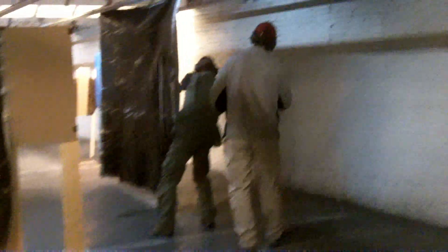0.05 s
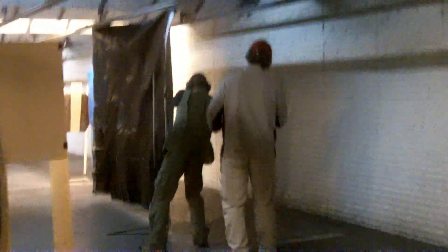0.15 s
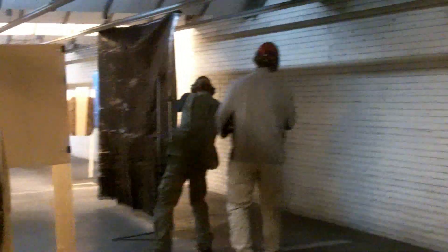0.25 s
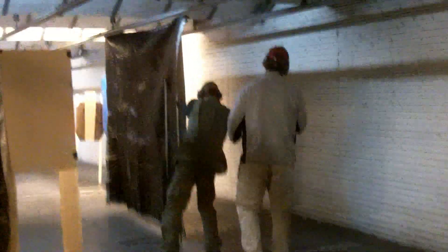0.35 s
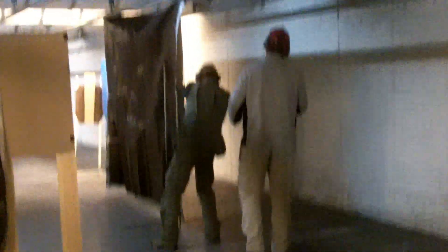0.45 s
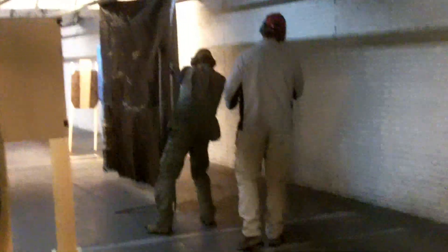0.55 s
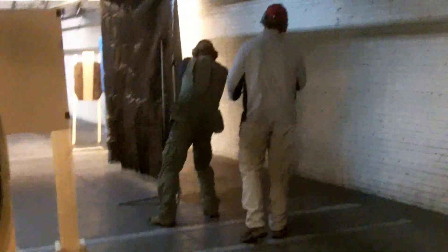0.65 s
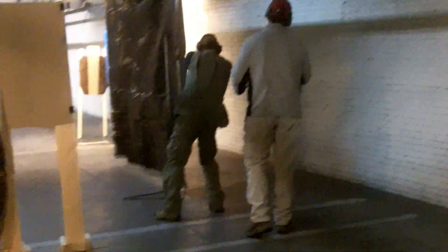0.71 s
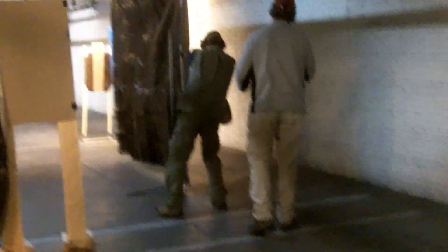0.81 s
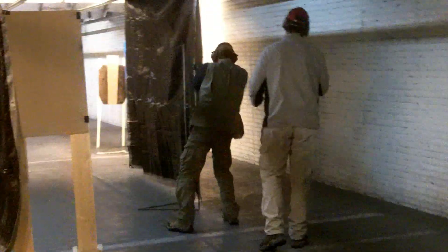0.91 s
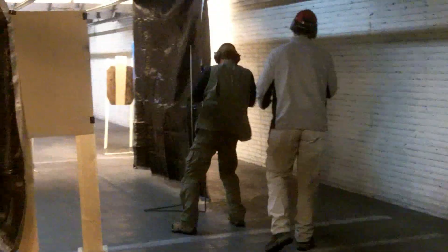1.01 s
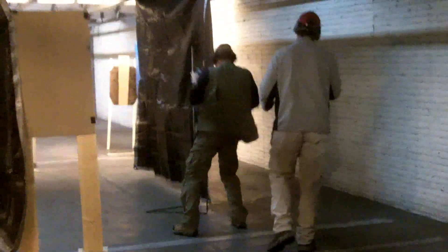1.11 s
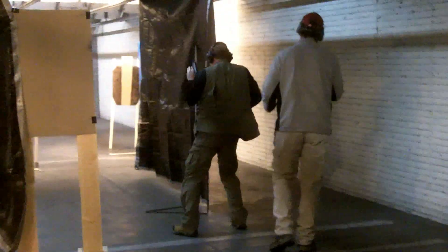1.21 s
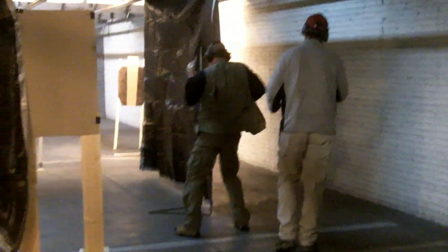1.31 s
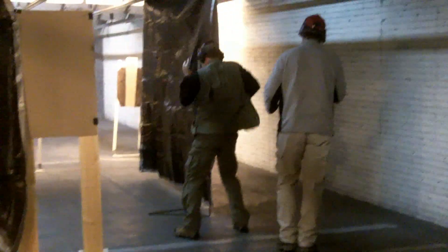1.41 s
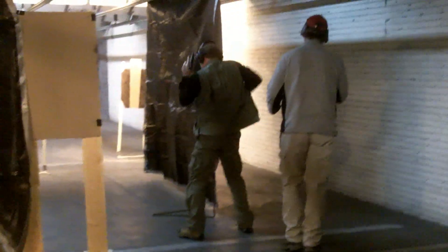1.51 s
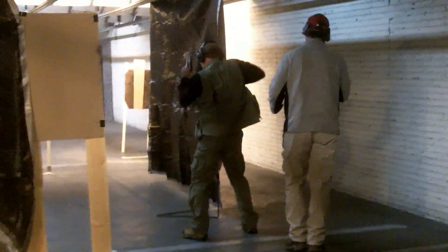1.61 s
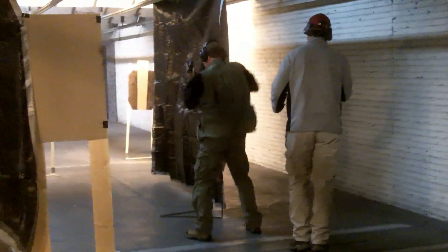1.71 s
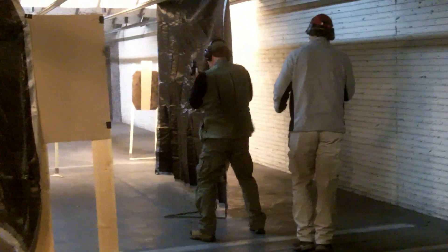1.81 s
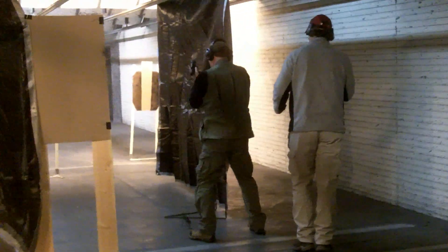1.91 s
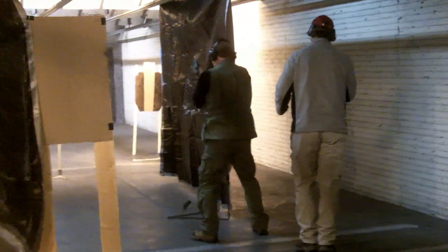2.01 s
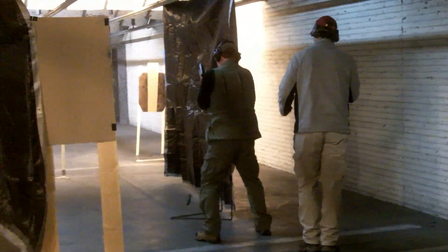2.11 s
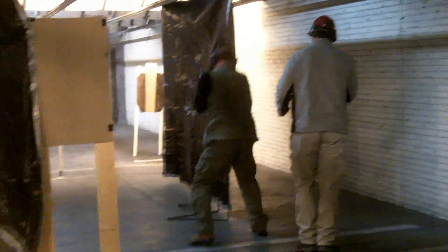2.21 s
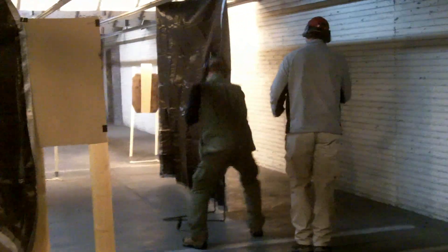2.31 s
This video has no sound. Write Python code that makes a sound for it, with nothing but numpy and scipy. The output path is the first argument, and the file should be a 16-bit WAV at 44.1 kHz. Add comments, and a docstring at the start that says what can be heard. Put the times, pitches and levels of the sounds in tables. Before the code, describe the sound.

Faint brass ticks and a high ring open over low ventilation rumble. Pistol shots crack at 0.23, 0.65 and 0.92 s, each with a low thump and dense concrete-hall echo, overloading the microphone and squashed by its limiter. The echo dulls and fades while cases tick from 1.36 s, more clearly near 1.86 and 2.03. Steel reload clacks strike at 2.09 and 2.26-2.28 s as the background drops.

```python
"""A small metallic tick and ring come first, then three pistol shots in a concrete indoor range.
Each blast is a pressure pulse with a noisy crack, a low thump and a long echo that dulls as it dies.
Spent cases tinkle as decaying tones and noise ticks, then a reload clacks as bursts of coloured noise.
Ventilation, made of shaped noise, rumbles throughout; echo and rumble sink at the first clack.
The recorder overloads, has a notch in the treble, and limits the level."""
import sys
import numpy as np
from scipy import signal
from scipy.fft import rfft, irfft
from scipy.io import wavfile

SR = 44100
rng = np.random.default_rng(int(sys.argv[2]) if len(sys.argv) > 2 else 0)


def materialize(psi):
    """Save the field psi as 16-bit PCM at rate SR to the path in sys.argv[1].

    A 1-D psi becomes a single channel; in a 2-D psi each row is a channel.
    """
    bounded = np.clip(np.atleast_2d(psi).T, -1, 1)
    quanta = np.round(bounded * 32767).astype(np.int16)
    wavfile.write(sys.argv[1], SR, quanta)


N = 105840
T = np.arange(N) / SR
HZ = np.maximum(np.arange(N // 2 + 1) * SR / N, 1)
TOP_CUT_HZ = 15450

# The pistol shots. Each row: start in seconds, level of blast and echo in dB, level of low thump in dB.
SHOTS = [(0.232, 0, 3.5), (.6535, -1, 0), (0.9176, -1.5, -2)]


def amp(db):
    """Turn decibels into a gain."""
    return 10 ** (np.asarray(db) / 20)


def at_hz(rows, hz, axis=1):
    """Read a column of a table at any frequency, with straight lines on a log-frequency axis."""
    rows = np.array(rows)
    return np.interp(np.log(hz), np.log(rows[:, 0]), rows[:, axis])


def noise(shape):
    """Noise whose spectrum has the given amplitude per root hertz."""
    white = rfft(rng.standard_normal(N))
    return irfft(white * shape * np.sqrt(SR / 2), N)


def unit_noise(shape):
    """Noise with a coloured spectrum, scaled to an rms of 1."""
    x = noise(shape)
    return x / x.std()


def resonance(hz, width_hz):
    """Noise gathered around one frequency with steep sides, rms 1."""
    return unit_noise(1 / (1 + ((HZ - hz) / width_hz) ** 2) ** 2)


def decay(start, t60):
    """A jump to 1 at the start, then an exponential fall of 60 dB in t60 seconds."""
    fall = np.log(1000) * np.maximum(T - start, 0) / t60
    return (T >= start) * np.exp(-np.minimum(fall, 40))


def bell(x, hz, width_hz, db):
    """Boost or dip the sound around one frequency by adding a filtered copy."""
    b, a = signal.iirpeak(hz, hz / width_hz, fs=SR)
    return x + (amp(db) - 1) * signal.lfilter(b, a, x)


def blasts():
    """The muzzle's pressure jumps up, swings below zero and recovers; near reflections add a crack."""
    pulse_s, pulse_db = 0.00067, 9.5   # time until the pressure crosses zero
    crack_db, crack_t60_s, crack_low_hz = -14.5, 0.088, 1500
    out = np.zeros(N)
    for start, db, _ in SHOTS:
        age = np.maximum(T - start, 0) / pulse_s
        pulse = (T >= start) * (1 - age) * np.exp(-np.minimum(age, 40))
        bright = HZ / (HZ + crack_low_hz) * (HZ < TOP_CUT_HZ)
        crack = unit_noise(bright) * decay(start, crack_t60_s)
        out += amp(db) * (amp(pulse_db) * pulse + amp(crack_db) * crack)
    return out


def thumps():
    """A low pressure wave, made of deep noise, swells in the hall just after each shot."""
    level_db, delay_s, width_s, top_hz = -14.5, 0.063, 0.04, 60
    swell = np.zeros(N)
    for start, _, db in SHOTS:
        hump = np.exp(-((T - start - delay_s) / width_s) ** 2)
        swell += amp(db) * hump * (T > start)
    return amp(level_db) * swell * unit_noise(1 / (1 + (HZ / top_hz) ** 4))


def echoes():
    """The hall fills with reflections after each shot and dies away band by band, at its own speed in each."""
    # Echo of a shot. Each row: frequency in Hz, starting level in dB per Hz, time to fall 60 dB in seconds.
    echo = [(30.1, -42, 0.26), (68.6, -35, 0.31), (143.4, -34, 1.06), (258, -32.5, 1.214), (550, -31, 1.04),
            (1030, -29.5, 0.75), (1930, -35.5, 0.67), (3040, -42.5, 0.66), (4180, -51.5, 0.68),
            (5630, -44.5, 0.57), (9000, -50, 0.41), (13100, -54, 0.24)]
    # A weaker, duller echo lasts this many times longer.
    linger_db, linger_times, linger_top_hz = -14, 2.646, 2770
    build_s = 0.034   # sets how quickly the echo fills the hall
    slap_s, slap_db, slap_width_s = 0.13, 0.5, 0.016   # a swell comes back from down the range
    out = np.zeros(N)
    step = np.log(2) / 2   # bands half an octave apart
    coloured = rfft(rng.standard_normal(N)) * amp(at_hz(echo, HZ)) * np.sqrt(SR / 2)

    swells = []
    for start, db, _ in SHOTS:
        slap = slap_db * np.exp(-((T - start - slap_s) / slap_width_s) ** 2)
        build = np.sqrt(1 - np.exp(-np.maximum(T - start, 0) / build_s))
        swells.append(amp(db + slap) * build)

    for hz in 22 * np.exp(step * np.arange(20)):
        window = np.maximum(1 - abs(np.log(HZ / hz)) / step, 0)
        band = irfft(coloured * window, N)
        t60 = at_hz(echo, hz, axis=2)
        # Powers add, so the falls are squared here and the root is taken at the end.
        linger = (amp(linger_db) * decay(0, t60 * linger_times)) ** 2
        fall = decay(0, t60) ** 2 + linger / (1 + (hz / linger_top_hz) ** 6)
        power = np.zeros(N)
        for (start, _, _), swell in zip(SHOTS, swells):
            power += swell ** 2 * np.interp(T - start, T, fall, left=0)
        out += band * np.sqrt(power)
    return out


def hall(x, wet_db):
    """Give a small sound the dense echo of the hall, a noise tail whose treble dies first."""
    low = 1 / (1 + (HZ / 5500) ** 4)
    low_tail = noise(low) * decay(.003, 0.75)
    treble_tail = noise(1.11 * (1 - low)) * decay(0.0037, 0.37)
    tail = low_tail + treble_tail
    tail = tail / np.sqrt(np.sum(tail ** 2))
    return x + amp(wet_db) * signal.fftconvolve(x, tail)[:N]


def cases():
    """Brass cases tick on concrete as short noise and ring on one high tone each."""
    # Each row: landing in seconds, ring in Hz, ring level in dB, time for the ring to fall 60 dB in seconds,
    # tick level in dB, tick frequency in Hz.
    landings = [(.015, 10970, -67, 0.8, -58, 5730), (.09, 8720, -76, 0.19, -54, 5800),
                (.13, 11070, -65, 0.92, -55, 5700), (1.36, 10450, -64, 0.11, -62, 6000),
                (1.591, 10900, -78, 0.27, -58, 7060), (1.734, 10900, -78, 0.46, -70, 7500),
                (1.859, 9950, -72, 0.48, -35, 5060), (2.028, 10500, -37, 0.04, -43, 8950)]
    tick_width_hz, tick_low_hz, tick_t60_s, echo_db = 700, 4570, 0.018, 4
    out = np.zeros(N)
    thin = 1 / (1 + (tick_low_hz / HZ) ** 30)   # removes the lows
    for start, hz, ring_db, t60, tick_db, tick_hz in landings:
        peak = 1 / np.hypot(1, (HZ - tick_hz) / tick_width_hz)
        tick = unit_noise(thin * peak / (1 + (HZ / 11500) ** 8))
        ring = np.sin(2 * np.pi * hz * (T - start))
        ring_level = decay(start, t60) - decay(start, .004)   # the difference softens the onset
        out += amp(ring_db) * ring * ring_level
        out += amp(tick_db) * tick * decay(start, tick_t60_s)
    return hall(out, echo_db)


def reload():
    """Steel parts strike: a bright burst, a hollow resonance and a higher ring fade together."""
    # Each row: start in seconds, level in dB, time to fall 60 dB in seconds, hollow resonance in Hz,
    # its level in dB beside the steel, ring in Hz, its level in dB beside the steel.
    clacks = [(2.091, -27.5, 0.035, 2180, 1, 6800, -7.5), (2.0988, -17, 0.0093, 2180, -12, 3260, 3),
              (2.258, -36.5, 0.26, 2180, -2, 6260, -5.5), (2.28, -27, 0.075, 1590, 0.5, 5460, -1.5)]
    # Colour of the pistol's steel. Each row: frequency in Hz, relative level in dB.
    steel_colour = [(500, -37.5), (1200, -6.5), (2200, -1.5), (3000, -1.5), (3800, -5), (4700, -5.5),
                    (5800, -6), (6800, 5), (9000, -7.5), (15000, -28)]
    cavity_width_hz, ring_width_hz, echo_db = 200, 700, -1
    out = np.zeros(N)
    steel = unit_noise(amp(at_hz(steel_colour, HZ)))
    for start, db, t60, cavity_hz, cavity_db, ring_hz, ring_db in clacks:
        cavity = amp(cavity_db) * resonance(cavity_hz, cavity_width_hz)
        ring = amp(ring_db) * resonance(ring_hz, ring_width_hz)
        out += amp(db) * (steel + cavity + ring) * decay(start, t60)
    return hall(out, echo_db)


def ventilation():
    """Rumble with two broad duct resonances, the upper one wavering, and a faint hiss."""
    # Spectrum of the steady noise. Each row: frequency in Hz, level in dB per Hz.
    spectrum = [(20, -47), (32, -51.5), (55, -62), (85, -59), (120, -52), (160, -57), (230, -49),
                (310, -64.5), (450, -76), (1000, -79), (2000, -85.5), (3500, -101), (6000, -107),
                (10000, -114), (15000, -128)]
    # Wavering of the upper rumble. Each row: time in seconds, level change in dB.
    waver = [(0, -2), (1.2, 6.5), (1.7, -1), (2.07, 3), (2.13, -5), (2.4, -1)]
    rumble_hz, rumble_width_hz = 247.6, 107
    shape = amp(at_hz(spectrum, HZ))
    duct = np.exp(-((HZ - rumble_hz) / rumble_width_hz) ** 2)   # share of power that wavers
    steady = noise(shape * np.sqrt(1 - duct))
    upper = noise(shape * np.sqrt(duct))
    return steady + upper * amp(np.interp(T, *np.transpose(waver)))


def scene():
    """Add up all the sounds; echo and rumble sink at the first clack and stay lower."""
    dip_s, dip_fall_s, dip_db = 2.09, 0.075, -4.5
    dip = amp(dip_db * np.clip((T - dip_s) / dip_fall_s, 0, 1))
    return (blasts() + thumps() + cases() + reload() + dip * (echoes() + ventilation()))[None]


def record(dry):
    """The microphone saturates and colours the sound; then come limiter, overload and a steep top cut."""
    capsule_db, overload_db, low_cut_hz = 3.5, 0, 20
    limit_db, window_s, release_db_per_s = -6, 0.021, 70
    x = amp(capsule_db) * np.tanh(dry[0] / amp(capsule_db))
    x = bell(x, 4270, 1100, -30)   # notch: centre Hz, width Hz, dB
    x = bell(x, 5990, 1220, 9.5)   # treble boost
    x = signal.lfilter(*signal.butter(1, low_cut_hz, "high", fs=SR), x)

    # Limiter: follow the average power, turn down at once, let go at a steady rate.
    keep = np.exp(-1 / (window_s * SR))
    power = signal.lfilter([1 - keep], [1, -keep], x * x)
    over = np.maximum(10 * np.log10(power + 1e-12) - limit_db, 0)
    release = release_db_per_s * T
    cut = np.maximum.accumulate(over + release) - release
    x = x * amp(-cut)

    x = x / (1 + (x / amp(overload_db)) ** 8) ** (1 / 8)   # flattens the peaks
    top_cut = signal.ellip(10, .1, 70, TOP_CUT_HZ, fs=SR, output="sos")
    return signal.sosfilt(top_cut, x)[None]


dry = scene()
out = record(dry)
materialize(out)
```